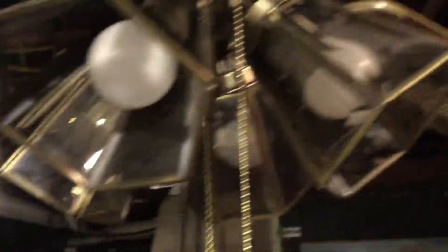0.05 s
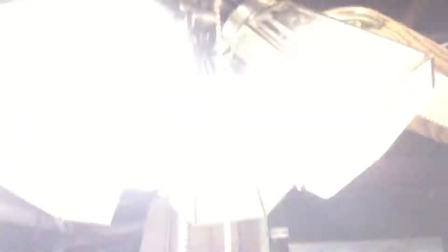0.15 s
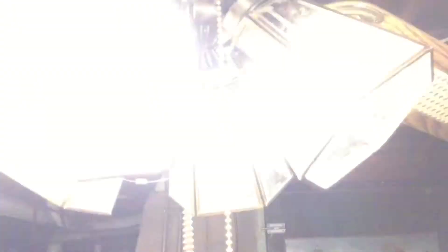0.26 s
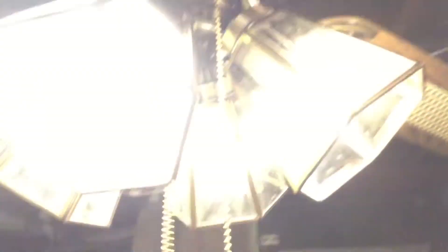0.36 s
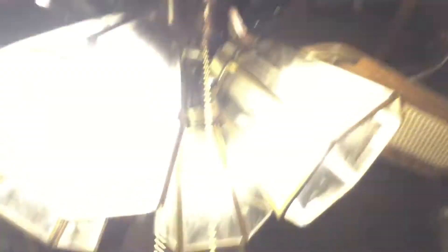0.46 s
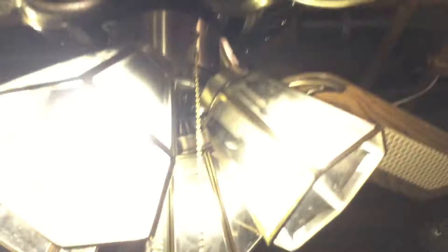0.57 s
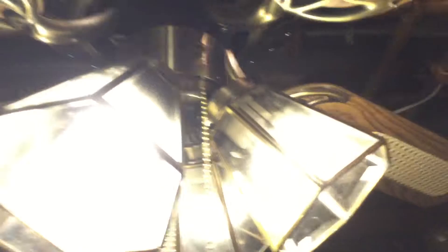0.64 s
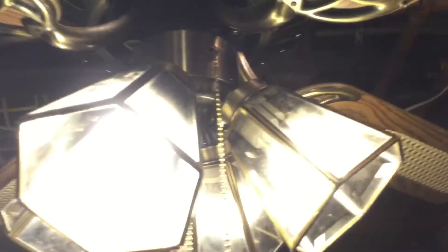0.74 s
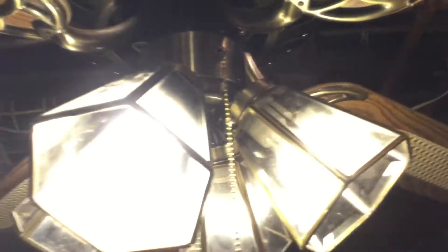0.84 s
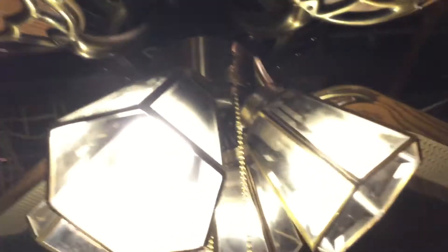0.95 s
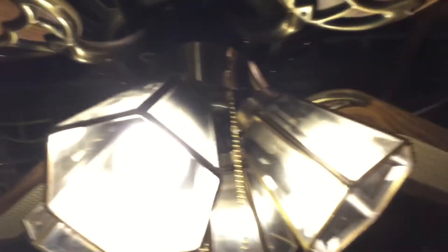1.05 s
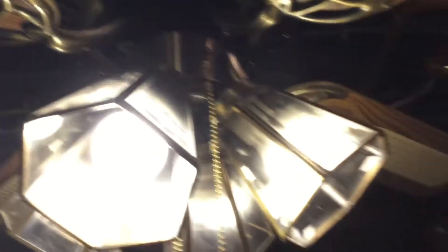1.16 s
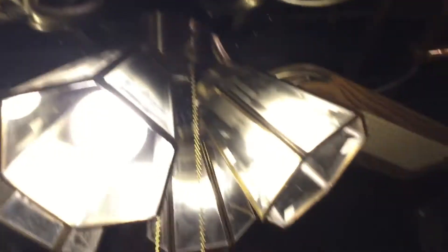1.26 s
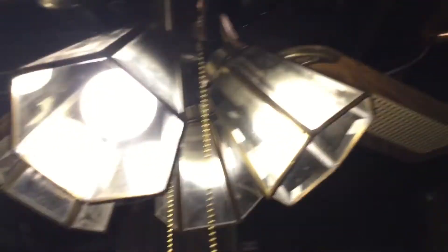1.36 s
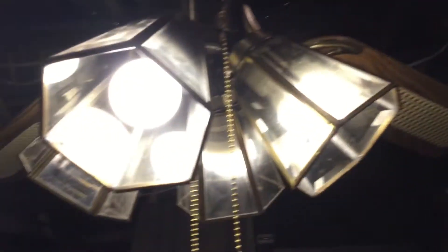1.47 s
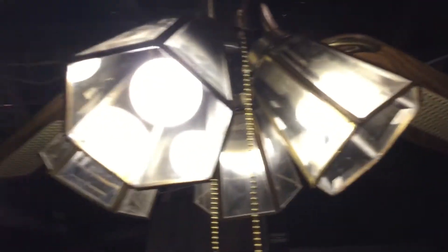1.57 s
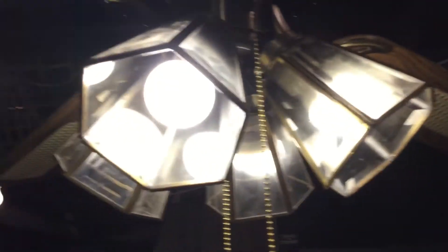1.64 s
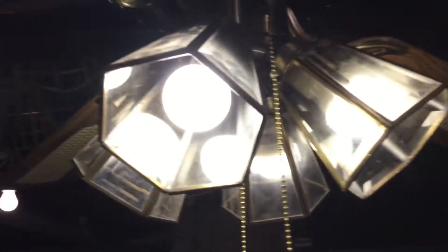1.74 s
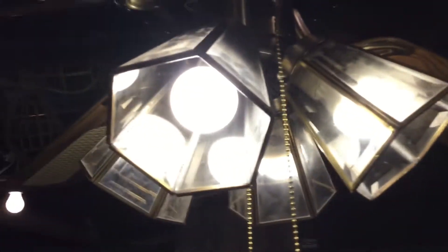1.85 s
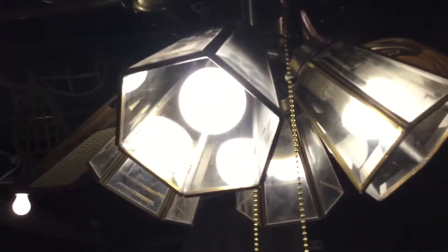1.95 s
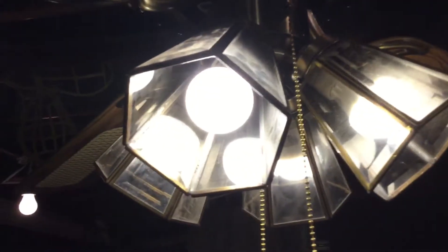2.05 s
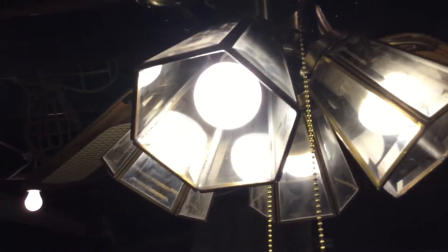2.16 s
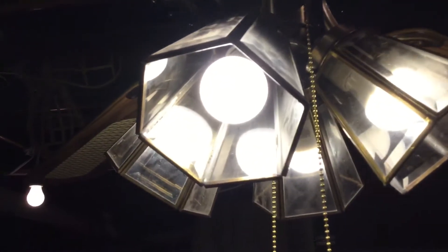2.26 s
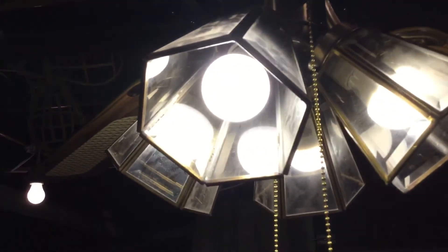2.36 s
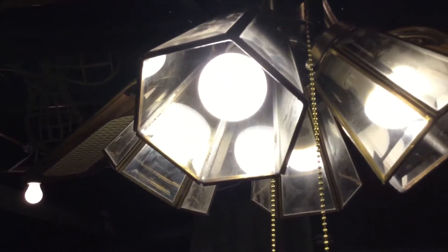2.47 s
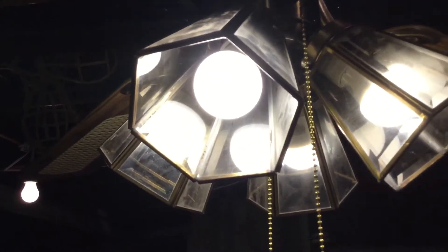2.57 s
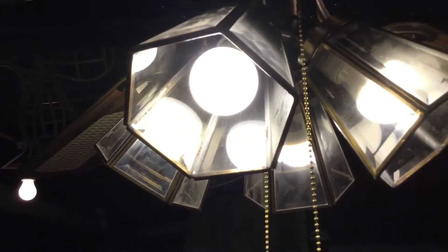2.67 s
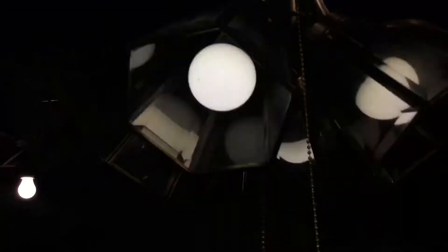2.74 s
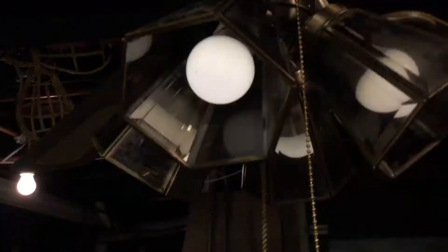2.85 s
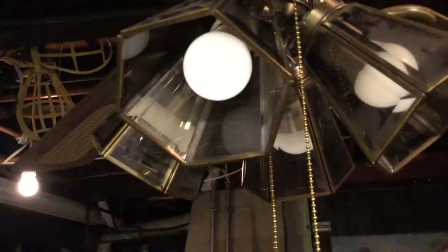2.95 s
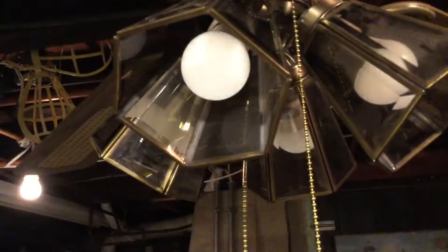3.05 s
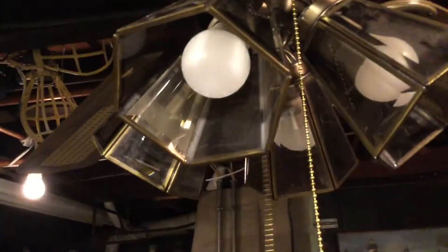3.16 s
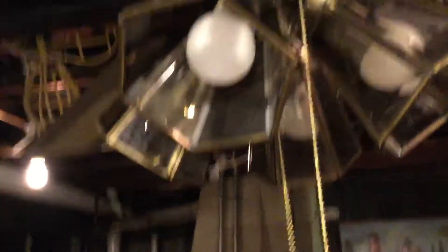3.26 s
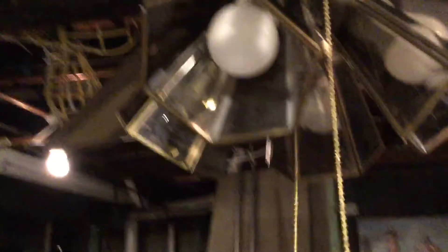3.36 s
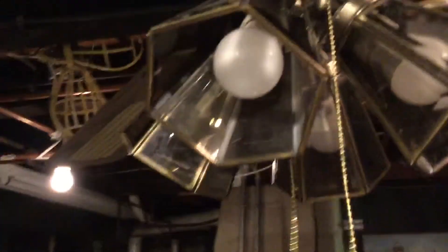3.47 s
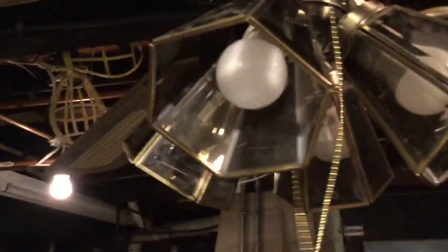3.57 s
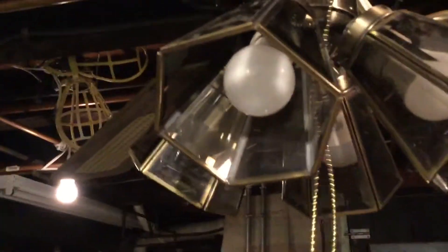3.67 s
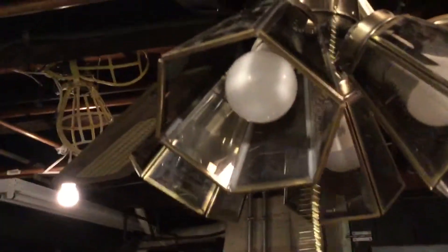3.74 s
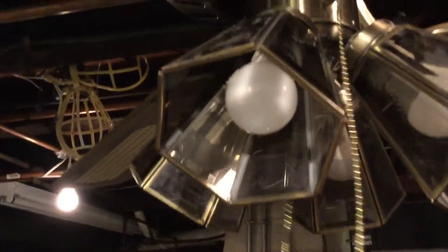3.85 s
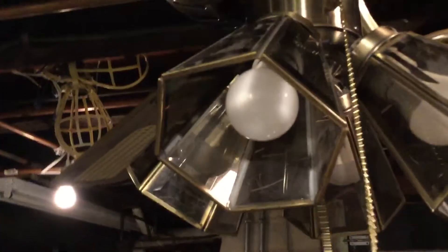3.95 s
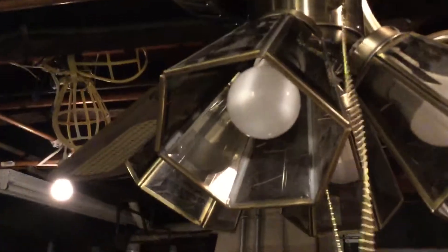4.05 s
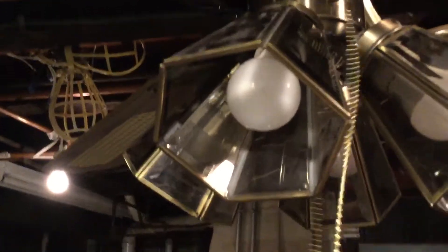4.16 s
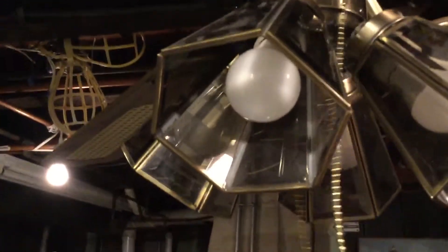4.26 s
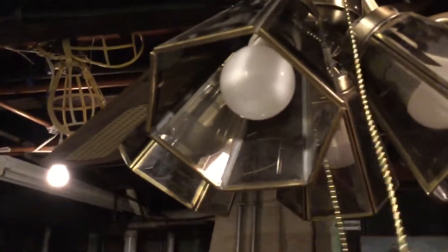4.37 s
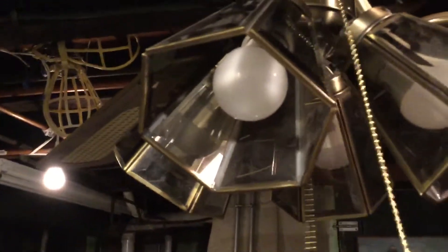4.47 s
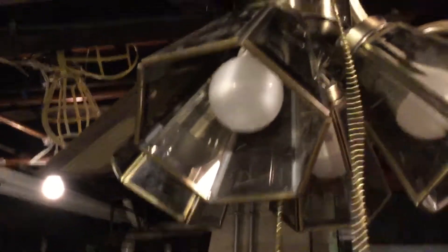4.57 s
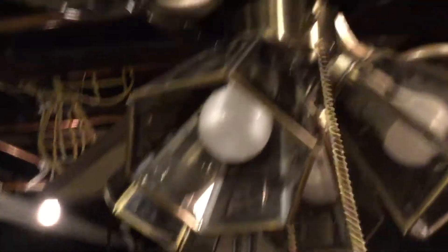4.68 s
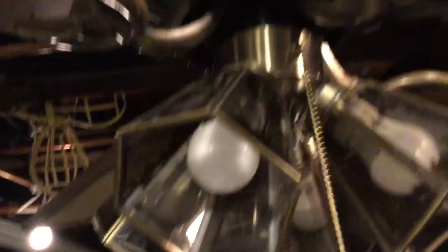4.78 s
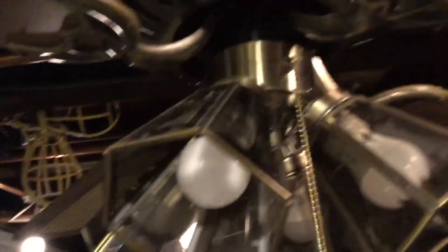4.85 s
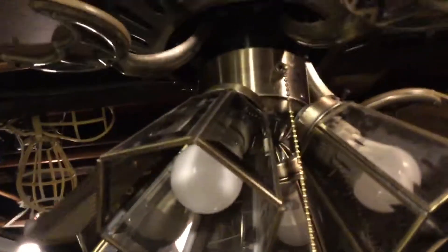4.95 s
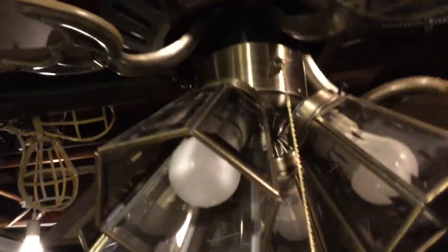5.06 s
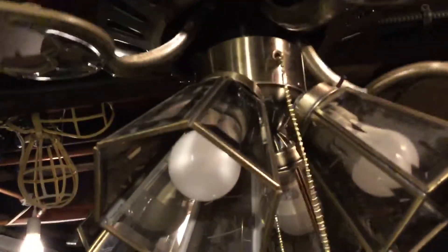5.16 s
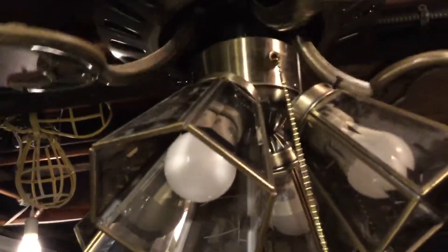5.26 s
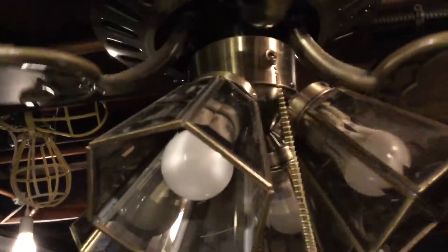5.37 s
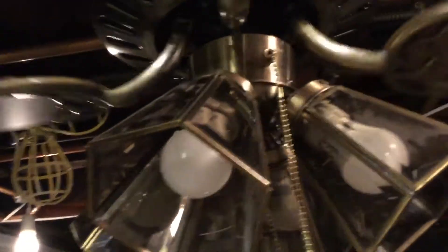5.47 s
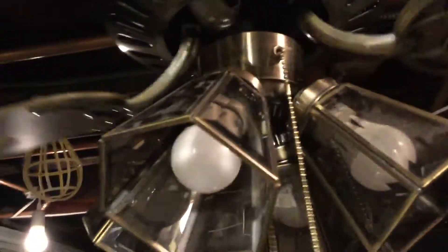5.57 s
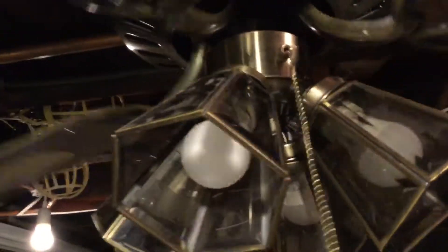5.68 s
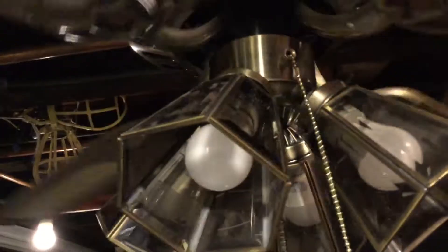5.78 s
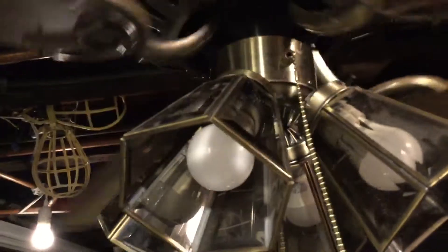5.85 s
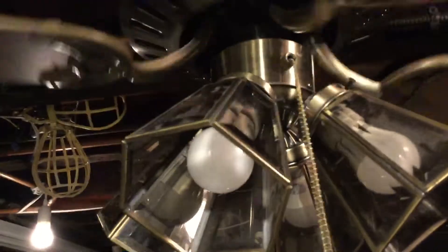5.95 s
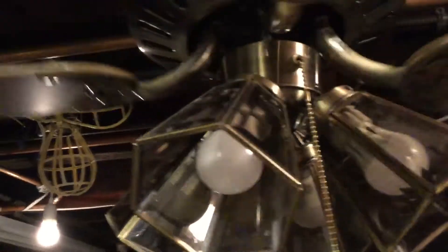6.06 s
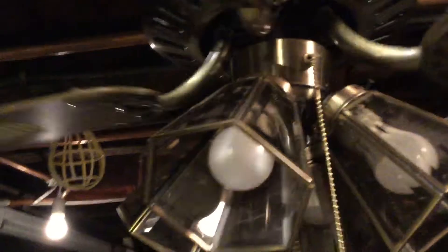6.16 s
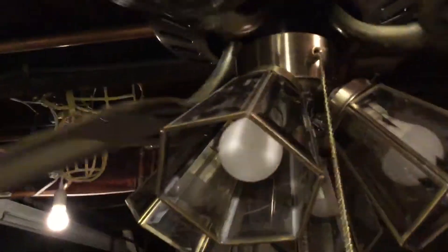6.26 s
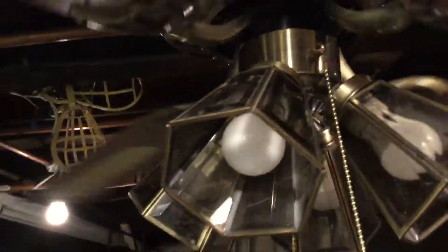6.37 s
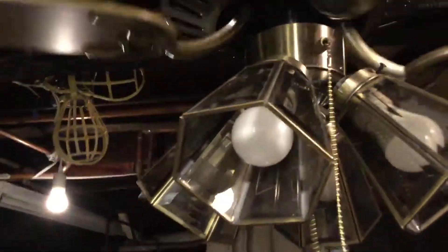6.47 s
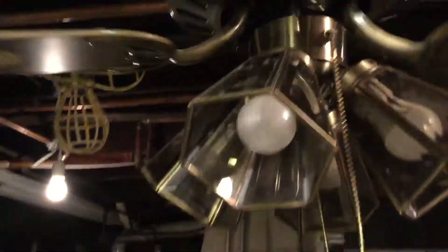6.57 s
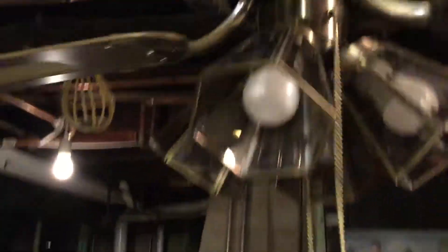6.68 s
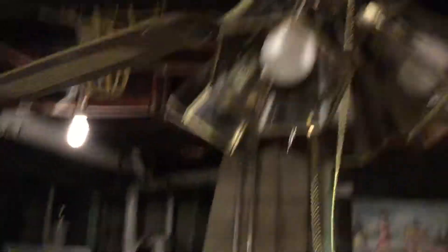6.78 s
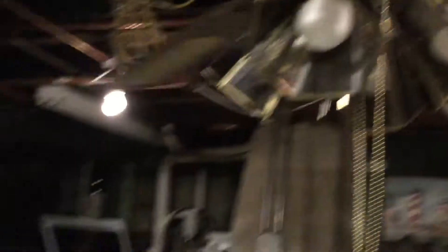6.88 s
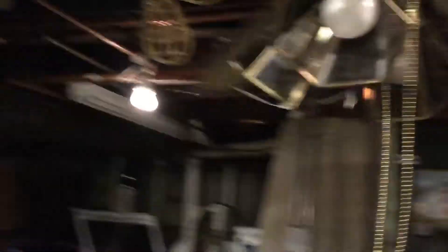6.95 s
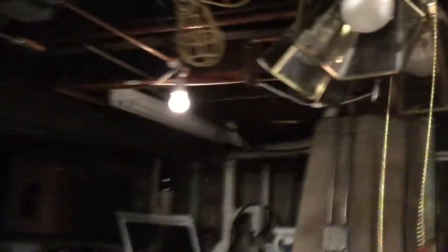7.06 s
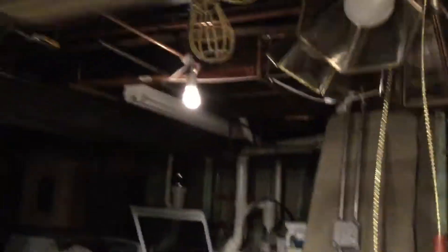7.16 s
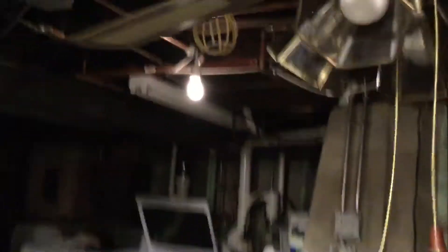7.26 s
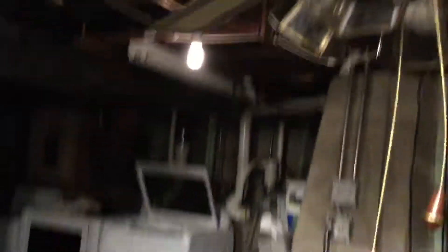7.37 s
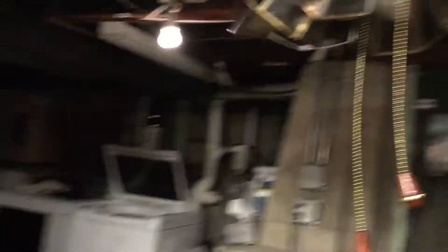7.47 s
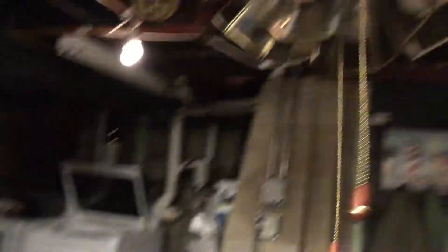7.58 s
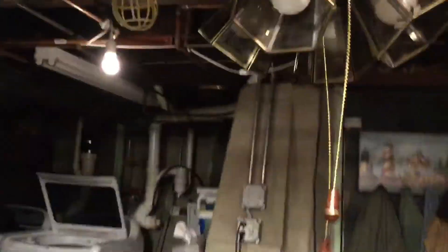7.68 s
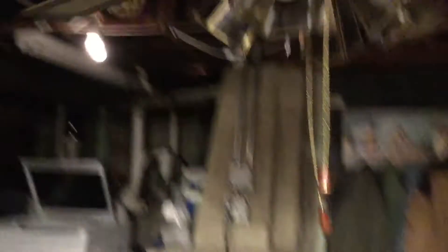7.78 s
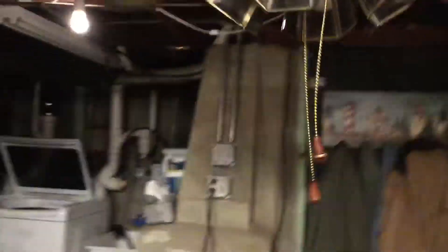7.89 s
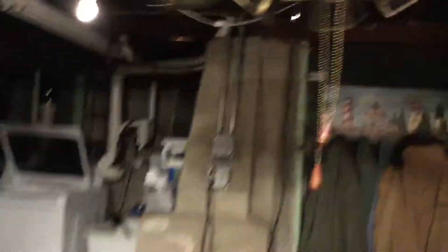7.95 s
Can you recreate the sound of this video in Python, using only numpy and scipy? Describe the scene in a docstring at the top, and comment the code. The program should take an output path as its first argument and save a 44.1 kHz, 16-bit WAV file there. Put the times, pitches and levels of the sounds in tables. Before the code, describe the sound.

Throughout, a quiet, wavering low fan hum and soft air wash sit under close, crisp mechanical sounds with a short basement echo. At 0.14 s a light chain is pulled with a ratcheting click and low thump, released at 0.28; the chain then taps glass from 0.43 at even intervals, fading rapidly. From 1.1 to 2.5 cloth scuffs softly, strongest near 1.6. The light switch clicks again at 2.8 and 2.9, followed by slack chain sliding until about 3.6. A metallic tick comes at 3.8, and a cloth brush at 4.3. Louder speed-switch snaps follow at 4.94, 5.49 and 6.06, released at 5.20, 5.77 and 6.35, with booms, beads zipping through brass and a brief low growl after the first. A mains-like buzz rises around 5.7 and eases after 6.4. From 7.1 to 7.45 fingers knock and rumble on the grip, then a slight scuff and hum until 8.

```python
"""In a basement, a ceiling fan hums close to a hand-held microphone.
Two pulls of a chain switch its light on and off, then the speed switch is pulled three times.
Switch teeth, chain and brass are short noise scrapes that set modes ringing; the housing booms in sines.
Beads, sliding chain and brushing clothes are trains of tiny contacts; fingers knock on the grip.
Wavering tones, a 120 Hz buzz and shaped noise make the motor and its air; scattered echoes make the room."""
import sys
import numpy as np
from scipy import signal
from scipy.fft import rfft, irfft
from scipy.io import wavfile
from scipy.ndimage import uniform_filter1d

SR = 44100
rng = np.random.default_rng(int(sys.argv[2]) if len(sys.argv) > 2 else 0)


def transcribe(u):
    """Save the signal u as a 16-bit wav file named by the first command-line argument.

    u: samples, shape (n,) or (channels, n), limited to [-1, 1]; the rate is SR.
    q: integer samples, one column per channel.
    """
    v = np.clip(np.atleast_2d(u).T, -1, 1)
    q = np.round(v * 32767).astype(np.int16)
    wavfile.write(sys.argv[1], SR, q)


N = 353770  # length [samples]


def amp(db):
    """Decibels to gain."""
    return 10 ** (np.asarray(db) / 20)


def evened(x):
    """Scales to rms 1."""
    return x / np.sqrt(np.mean(abs(x) ** 2) + 1e-20)


def unit(x):
    """Scales to energy 1."""
    return x / (np.linalg.norm(x) + 1e-12)


def read(points, hz):
    """Reads a table on a log-frequency axis."""
    f, value = np.transpose(points)
    return np.interp(np.log(hz + 1), np.log(f + 1), value)


def add(mix, s, sound):
    """Lays a sound into the mix at time s."""
    part = mix[max(round(s * SR), 0):][:len(sound)]
    part += sound[:len(part)]


def colour(x, points, size=2048):
    """Minimum-phase filter with the given (frequency [Hz], gain [dB]) shape."""
    log_gain = np.log(amp(read(points, abs(np.fft.fftfreq(size, 1 / SR)))))
    taps = np.fft.ifft(np.exp(np.conj(signal.hilbert(log_gain)))).real
    return signal.fftconvolve(x, taps[:size // 2])[:len(x)]


def drift(width_hz, rate_hz=400):
    """Slow complex random modulation of rms 1, weaker beyond the given width."""
    hz = np.fft.fftfreq(4096, 1 / rate_hz)
    spectrum = np.exp(2j * np.pi * rng.random(len(hz))) / (1 + (hz / width_hz) ** 2)
    slow = np.fft.ifft(spectrum)
    return evened(np.interp(np.arange(N) / SR, np.arange(len(hz)) / rate_hz, slow))


def swells(rows):
    """Gain per sample of movements that each rise to a peak and fall away."""
    t = np.arange(N) / SR
    return sum(amp(db) * np.exp(-((t - s) / np.where(t < s, rise, fall)) ** 2)
               for s, db, rise, fall in rows)


def ring(modes, t):
    """Dying sines with random starting phases, as a struck part rings; energy 1."""
    return unit(sum(amp(db - 60 * t / t60) * np.sin(2 * np.pi * (hz * t + rng.random()))
                    for hz, db, t60 in modes))


def clicks(rows, blow, modes, ring_db, rattle_db, rattle_s, ping_s, uneven_db=3):
    """Each contact is a short scrape with a fading rattle, the part's ringing modes and one short ping."""
    out, t = np.zeros(N), np.arange(SR // 5) / SR
    for s, db, thud_db, sparkle_db, length, ping_hz, ping_db in rows:
        scrape, rattle = rng.standard_normal((2, len(t))) * (rng.random((2, len(t))) < .5)
        chatter = amp(uneven_db * evened(uniform_filter1d(rng.standard_normal(len(t)), size=40)))
        u = t / max(length, 1e-4)
        scrape = unit(scrape * u * np.exp(-2.3 * u))
        rattle = unit(rattle * chatter * (1 - np.exp(-u)) * np.exp(-t / rattle_s))
        contact = scrape + amp(rattle_db) * rattle
        build = 1 - np.exp(-2 * u)  # ringing grows while the contact lasts
        body = unit(colour(contact, blow)) + amp(ring_db) * ring(modes, t) * build
        body = unit(colour(body, [(900, thud_db), (2000, 0), (5500, 0), (11000, sparkle_db)]))
        # the spot that is struck favours one short resonance
        ping = unit(build * np.exp(-t / ping_s) * np.sin(2 * np.pi * ping_hz * t))
        body = body + amp(ping_db) * ping
        attack_rms = np.sqrt(np.mean(body[t < .008] ** 2))
        add(out, s, amp(db) * body / attack_rms)
    return out


def strokes(rows, teeth):
    """Clicks of a switch: each stroke passes the same teeth at its own pace, then snaps."""
    hits = []
    for s, db, travel, ratchet_db, ping_hz, *_ in rows:
        for k, (to_go, accent_db, thud_db, sparkle_db, length, ping_db) in enumerate(teeth):
            is_snap = k == len(teeth) - 1
            hit_db = db + accent_db + (0 if is_snap else ratchet_db)
            hits.append((s - to_go * travel, hit_db, thud_db, sparkle_db, length, ping_hz, ping_db))
    return hits


def touches(rows, touch):
    """Clicks of one kind of contact, differing only in time, strength and sparkle."""
    thud_db, length, ping_hz, ping_db = touch
    return [(s, db, thud_db, sparkle_db, length, ping_hz, ping_db) for s, db, sparkle_db in rows]


def grains(per_s, spread_db, clump_db=3, clump_hz=70):
    """A random train of tiny contacts of uneven size that come in clumps; rms 1."""
    size = amp(abs(spread_db) * np.minimum(rng.exponential(1, N), 4))
    clumps = amp(clump_db * np.clip(evened(drift(clump_hz).real), -2, 2))
    hits = rng.standard_normal(N) * (rng.random(N) < per_s / SR)
    return evened(size * clumps * hits)


def rubbing(gain, shape, per_s, clump_db=2):
    """Surfaces catch and slip in many tiny contacts."""
    return gain * evened(colour(grains(per_s, spread_db=0.6, clump_db=clump_db), shape))


# pulls of the speed chain: (time of the snap [s], level [dB], ratchet travel [s], ratchet re snap [dB],
# ping [Hz], low boom [dB], high boom [dB], beads [dB])
SPEED_PULLS = [(4.9412, -23.5, .0326, -9.5, 2740, -37.5, -48, -63.5),
               (5.4903, -25, .0335, -7.5, 2780, -45.5, -37, -57),
               (6.0556, -25.5, .0264, -5.5, 2690, -48.5, -38.5, -53)]
# the speed chain is let go: (time of the snap [s], level [dB], ratchet travel [s],
# ratchet re snap [dB], ping [Hz])
SPEED_RETURNS = [(5.2047, -24, .0263, -4.5, 5320), (5.7684, -22, .0244, -7, 1745),
                 (6.3539, -21.5, .0356, -11.5, 4205)]
# teeth of each stroke, last row the snap: (share of travel to go [0-1], accent [dB], extra thud [dB],
# extra sparkle [dB], scrape length [s], ping [dB])
SPEED_PULL_TEETH = [(1, -1, 4, 4, .0045, -2), (.35, 0, 10, -2, .006, -4), (0, 0, 5.5, -6, .0044, -5)]
SPEED_RETURN_TEETH = [(1, .5, 4, 5, .0023, -9), (.5, -.5, -4, 2, .0026, -13), (0, 0, 2, 0, .003, -9)]  # same columns
# beads catch at the mouth of the switch: (time [s], level [dB], extra sparkle [dB])
BEAD_CATCHES = [(4.899, -42, -10), (5.4293, -47.5, -14), (6.0005, -43, 2), (6.0145, -38, 7),
                (6.2754, -46, -8)]
# feel of a bead catch: (extra thud [dB], scrape length [s], ping [Hz], ping level [dB])
CATCH_TOUCH = (8, .008, 900, -9)
# colour of the blow: (frequency [Hz], relative level [dB])
SPEED_BLOW = [(130, -6.5), (290, -10.5), (420, -15.5), (650, -16), (950, -4.5), (2200, 1), (2800, 1.5),
              (5500, -2.5), (8000, -6), (10000, -11.5), (12000, -6.5), (14200, 0.5), (16000, -10.5)]
# ringing of the switch: (frequency [Hz], relative level [dB], t60 [s])
SPEED_MODES = [(926, 3.5, 0.023), (1116, -8, 0.17), (1278, -13.5, .1), (1778, -1, .04), (2650, 4, 0.034),
               (2870, 0.5, 0.017), (2805, -2, 0.075), (3360, -2.5, .05), (3600, -2, 0.094),
               (3780, 4, 0.046), (4100, -4, 0.068), (4540, -4, 0.1), (5470, 2, 0.072), (5376, 4.5, 0.026),
               (5930, -3, .06), (6770, 1, 0.072), (13780, -4, 0.034), (15830, -6, .05)]


def speed_switch():
    """A ratchet ticks over its teeth and snaps, on each pull and each release; beads catch at its mouth."""
    hits = strokes(SPEED_PULLS, SPEED_PULL_TEETH) + strokes(SPEED_RETURNS, SPEED_RETURN_TEETH)
    hits += touches(BEAD_CATCHES, CATCH_TOUCH)
    return clicks(hits, SPEED_BLOW, SPEED_MODES, ring_db=-8.5, rattle_db=-7, rattle_s=0.015,
                  ping_s=0.0039, uneven_db=4.5)


# pulls of the light chain: (time of the snap [s], level [dB], ratchet travel [s], ratchet re snap [dB],
# ping [Hz], low boom [dB])
LIGHT_PULLS = [(0.1425, -27.5, .034, -12.5, 3800, -45.5), (2.8087, -29.5, .037, -18, 2440, -50)]
# the light chain is let go: (time of the snap [s], level [dB], ratchet travel [s],
# ratchet re snap [dB], ping [Hz])
LIGHT_RETURNS = [(0.2766, -28.5, .0244, -12, 3730), (2.9242, -25.5, .034, -14, 3460)]
# teeth of each stroke, last row the snap: (share of travel to go [0-1], accent [dB], extra thud [dB],
# extra sparkle [dB], scrape length [s], ping [dB])
LIGHT_PULL_TEETH = [(1, -9.5, 5, -22, .014, -12), (.3, -2, -3, -3, .013, -13), (0, 0, 3.5, 0, .0019, -6.5)]
LIGHT_RETURN_TEETH = [(1, -10, -9, -9, .008, -16), (.3, 0, -20, -11, .008, -20), (0, 0, 2, -4, .0027, -8)]  # same columns
# colour of the blow: (frequency [Hz], relative level [dB])
LIGHT_BLOW = [(150, -36), (350, -6.5), (550, 0.5), (900, -3.5), (1700, -5), (3700, -2), (4900, -12),
              (7000, -5.5), (9500, -20.5), (12300, -7.5), (15500, -15.5)]
# ringing of the switch: (frequency [Hz], relative level [dB], t60 [s])
LIGHT_MODES = [(450, -2, 0.055), (572.7, -3.5, 0.16), (1144, -1, 0.054), (1398, -4.5, 0.038),
               (2080, -7.5, 0.17), (2206, -0.5, 0.048), (2510, -10, 0.044), (3070, 1.5, 0.1),
               (3470, -2.5, .04), (3760, 5, 0.065), (4090, -12, .06), (5420, -4, .08), (7200, -8.5, 0.051),
               (6640, -7, .04), (13000, -18, .04)]


def light_switch():
    """A ratchet ticks over its teeth and snaps, on each pull and each release."""
    hits = strokes(LIGHT_PULLS, LIGHT_PULL_TEETH) + strokes(LIGHT_RETURNS, LIGHT_RETURN_TEETH)
    return clicks(hits, LIGHT_BLOW, LIGHT_MODES, ring_db=-7.5, rattle_db=-4.5, rattle_s=.016,
                  ping_s=0.0024, uneven_db=4)


# low and high boom of the housing: (frequency [Hz], hold [s], t60 [s])
HOUSING_MODES = [(61, .07, .25), (108, .098, .15)]


def housing(delay_s=.003, rise_s=0.004, shake=0.45, after_db=-13, after_t60_s=1.1):
    """Each pull sets off low booms that swell, hold and die away into a faint after-ring."""
    out, t = np.zeros(N), np.arange(SR) / SR
    low, high = HOUSING_MODES
    booms = [(s, low_db, *low) for s, _, _, _, _, low_db, *_ in LIGHT_PULLS + SPEED_PULLS]
    booms += [(s, high_db, *high) for s, *_, high_db, _ in SPEED_PULLS]
    for s, db, hz, hold, t60 in booms:
        main_fade_db = -60 * np.maximum(t - hold, 0) / t60
        fade_db = np.maximum(main_fade_db, after_db - 60 * t / after_t60_s)
        swell = (1 - np.exp(-(t / rise_s) ** 2)) * amp(db + fade_db)
        tone = ((1 + shake * drift(25)[:SR]) * np.exp(2j * np.pi * hz * t)).imag
        add(out, s + delay_s, np.sqrt(2) * swell * tone)
    return out


def bounces(count=4, start_s=0.4306, period_s=.0933, db=-33.3, loss_db=8.7, sparkle_db=-2.5):
    """The freed chain swings against a shade at even intervals, losing the same share each time."""
    return [(start_s + k * period_s, db - k * loss_db, sparkle_db) for k in range(count)]


# stray slaps on the glass: (time [s], level [dB], extra sparkle [dB])
CHAIN_SLAPS = [(0.2872, -32, -35), (0.3448, -50, -10), (0.5086, -50.5, -12), (2.935, -36, -23),
               (3.1097, -48.5, -3), (3.5182, -55, -19), (3.617, -58, -25), (4.795, -56, -19),
               (6.553, -58.5, -7)]
# feel of a slap: (extra thud [dB], scrape length [s], ping [Hz], ping level [dB])
CHAIN_TOUCH = (6, .0017, 3520, -4.5)
# colour of the blow: (frequency [Hz], relative level [dB])
CHAIN_BLOW = [(400, -15), (1700, -19), (2200, -5), (3600, 3.5), (4900, -16.5), (6400, -14.5), (7900, 0),
              (9500, -26), (12000, -21), (14000, 0), (16000, -29.5)]
# ringing of chain on glass: (frequency [Hz], relative level [dB], t60 [s])
CHAIN_MODES = [(2125, 3.5, 0.08), (2800, -46, .09), (2970, -26, .1), (3450, 5, 0.09), (3578, 2, 0.096),
               (3810, 1, .12), (5420, -20, 0.17), (6190, -7.5, 0.1), (7400, 6, .06), (8000, -13, .07),
               (14180, -14, 0.053), (14600, -3, .05)]


def chain_on_glass():
    """The chain slaps the glass shades: bright contacts with a rattle and glassy ringing."""
    return clicks(touches(bounces() + CHAIN_SLAPS, CHAIN_TOUCH), CHAIN_BLOW, CHAIN_MODES,
                  ring_db=-7, rattle_db=0.5, rattle_s=0.013, ping_s=0.0013)


# ticks on the fitting: (time [s], level [dB], extra sparkle [dB])
BRASS_TICKS = [(3.7786, -44, 0.5), (4.026, -63, 2), (4.565, -59, 0), (4.694, -56, -3), (4.8189, -55, -25),
               (6.9191, -54, -30)]
# feel of a tick: (extra thud [dB], scrape length [s], ping [Hz], ping level [dB])
BRASS_TOUCH = (0, .0035, 4800, -7)
# colour of the blow: (frequency [Hz], relative level [dB])
BRASS_BLOW = [(400, 2), (1100, -10), (1600, -1.5), (2400, -2), (4000, -2), (4850, -0.5), (5800, -5),
              (7000, -2), (7900, -4), (8600, -8), (12300, -3), (16000, -15)]
# ringing of the fitting: (frequency [Hz], relative level [dB], t60 [s])
BRASS_MODES = [(2260, 4, 0.043), (4600, -4.5, 0.023), (5000, -5, 0.054), (6930, 5, .04), (8480, 4, 0.076),
               (12300, -7, .04)]


def chain_on_brass():
    """The chain ticks against the brass fitting, which rings briefly."""
    return clicks(touches(BRASS_TICKS, BRASS_TOUCH), BRASS_BLOW, BRASS_MODES,
                  ring_db=-8.5, rattle_db=-7, rattle_s=.008, ping_s=0.0029)


# the hand gathers the speed chain: (time of the peak [s], level [dB], rise [s], fall [s])
GATHERS = [(4.73, -66, .07, .15), (5.135, -65, .025, .02), (5.405, -63, .025, .025)]
# ringing of the taut chain and its fitting: (frequency [Hz], relative level [dB], t60 [s])
BEAD_MODES = [(1070, -10.5, 0.049), (1330, -17, 0.049), (2165, -5, .02), (2930, -5.5, .03),
              (3670, -14, .04), (4440, -3.5, .025), (5340, -8, .03), (8430, -11, .02),
              (10800, -12.5, 0.017), (13000, -0.5, .006), (14000, -5, .008), (14500, 2, 0.0046)]
# the taut chain sings: (frequency [Hz], relative level [dB])
CHAIN_TONES = [(4436, -77), (5319, -72), (13464, -80), (13609, -79), (14002, -70), (14314, -74),
               (14341, -75), (14707, -78), (15219, -82)]
# colour of the bare ticks: (frequency [Hz], relative level [dB])
BEAD_COLOUR = [(300, -14), (1000, 3), (2500, -5.5), (5000, -2.5), (7000, -6), (10000, -11), (12500, -5),
               (14300, 6.5), (16000, -8.5)]


def beads(ring_db=-2, sing_db=-5.5, sing_t60_s=.25, delay_s=.06, rise_s=.075, fall_s=.105):
    """Beads of the taut chain run through the brass fitting after each speed pull and make it sing."""
    runs = [(s + delay_s, db, rise_s, fall_s) for s, *_, db in SPEED_PULLS]
    ticks, t = grains(per_s=2500, spread_db=2, clump_db=4), np.arange(SR // 4) / SR
    tones = [(hz, db, sing_t60_s) for hz, db in CHAIN_TONES]
    rung = signal.fftconvolve(ticks, ring(BEAD_MODES, t))[:N]
    sung = signal.fftconvolve(ticks, ring(tones, t))[:N]
    bare = evened(colour(ticks, BEAD_COLOUR))
    return swells(GATHERS + runs) * evened(amp(ring_db) * evened(rung) + amp(sing_db) * evened(sung) + bare)


# movements of the slack chain: (time of the peak [s], level [dB], rise [s], fall [s])
SLIDES = [(3.035, -57, .03, .022), (3.22, -61, .025, .035), (3.47, -58, .13, .16)]
# colour of chain on skin: (frequency [Hz], relative level [dB])
SLIDE_COLOUR = [(200, 2), (800, 6), (1700, 1), (2200, 4), (2800, -4), (3700, -2), (4400, -8), (7500, -10),
                (10000, -18), (15500, -15.5)]


def chain_slide():
    """The slack chain slides through the fingers in a dense train of contacts."""
    return rubbing(swells(SLIDES), SLIDE_COLOUR, per_s=14000)


# fingers on the grip: (time [s], level [dB], extra thud [dB], extra sparkle [dB], scrape length [s],
# ping [Hz])
GRIP_KNOCKS = [(7.1406, -48.5, 6, -4, .005, 1200), (7.1575, -33.5, 14, -4, .002, 330),
               (7.1693, -44, 22, -15, .0099, 650), (7.187, -49, 2, -16, .002, 920),
               (7.2241, -54.5, 11, -2, .0017, 590), (7.2674, -39, -2, 8, .001, 900),
               (7.2798, -46, 5, -6, .0014, 390), (7.3287, -36.5, 27, 4, .0012, 660),
               (7.342, -48, 13, 8, .004, 600), (7.3803, -44.5, -12, -12, .0014, 390),
               (7.4265, -32, 7, -8, .0043, 1090), (7.434, -38, 4, -7, .0081, 280),
               (7.442, -31, -4, -8, .00084, 420)]
# colour of the blow: (frequency [Hz], relative level [dB])
GRIP_BLOW = [(50, -18), (250, -1.5), (650, -3.5), (1100, 0.5), (1800, -15), (4800, -14.5), (6200, -20),
             (10000, -18), (16000, -41)]
# ringing of the grip: (frequency [Hz], relative level [dB], t60 [s])
GRIP_MODES = [(620, 7, 0.027), (875, 1, 0.011), (1240, -5, .012)]


def grip_knocks(ping_db=-5.5):
    """Fingers knock on the grip: short blows on a body that rings only briefly."""
    return clicks([(*knock, ping_db) for knock in GRIP_KNOCKS], GRIP_BLOW, GRIP_MODES,
                  ring_db=-10.5, rattle_db=-14, rattle_s=0.0066, ping_s=0.0018)


# shifts of the fingers: (time of the peak [s], level [dB], rise [s], fall [s])
RUMBLES = [(7.168, -41, .02, .018), (7.4, -56, .07, .05)]
# colour of the case: (frequency [Hz], relative level [dB])
RUMBLE_COLOUR = [(20, -13), (45, -1.5), (80, -8.5), (160, -11), (330, -8.5), (600, -19), (2000, -56)]


def case_rumble():
    """The case rumbles as the fingers shift: sparse contacts with most of the treble removed."""
    return rubbing(swells(RUMBLES), RUMBLE_COLOUR, per_s=2000)


# brushes as the arm moves: (time of the peak [s], level [dB], rise [s], fall [s])
BRUSHES = [(1.79, -62, .1, .07), (2.49, -61, .025, .03), (3.70, -58, .03, .05), (4.21, -61, .018, .04),
           (4.32, -51, .04, .045), (7.28, -59.5, .12, .2), (7.415, -51.5, .035, .02)]
# the cloth catches and lets go: (time [s], level [dB], decay time [s])
SCUFFS = [(1.125, -60, 0.034), (1.372, -49.5, 0.029), (1.580, -39.5, 0.03), (1.778, -60, 0.045),
          (1.816, -54, 0.018), (1.929, -51, 0.023), (2.268, -62, 0.033), (2.35, -58, 0.017),
          (2.512, -54, 0.018), (3.638, -54, 0.084), (4.287, -53.5, 0.04), (4.846, -46, 0.064),
          (5.703, -48.5, 0.07), (7.52, -51.5, .025)]
# colour of the cloth: (frequency [Hz], relative level [dB])
BRUSH_COLOUR = [(120, -9.5), (300, 7), (450, -4), (650, 2.5), (1200, 3), (1700, 0.5), (2200, -2),
                (4000, -6), (6000, -15), (9000, -25), (16000, -34)]


def clothes(rise_s=0.0018):
    """Cloth brushes as the arm moves, with sudden scuffs that die away."""
    gain, t = swells(BRUSHES), np.arange(SR // 3) / SR
    for s, db, decay in SCUFFS:
        add(gain, s, amp(db) * (1 - np.exp(-t / rise_s)) * np.exp(-t / decay))
    return rubbing(gain, BRUSH_COLOUR, per_s=8000, clump_db=2.2)


# growl after the first change of speed: (time of the peak [s], level [dB], rise [s], fall [s])
GROWL = (5.13, -50, .06, .27)


def growl(hz=63, shake=.5, shake_hz=14):
    """A low, unsteady growl while the motor takes up its new speed."""
    carrier = np.exp(2j * np.pi * hz * np.arange(N) / SR)
    return swells([GROWL]) * evened(((1 + shake * drift(shake_hz)) * carrier).real)


# motor hum: (frequency [Hz], level [dB], waver [share 0-1], waver width [Hz])
HUM = [(59, -73, 0.5, 5.4), (106.7, -68.5, 1, 8), (147, -61.5, .85, 8), (199.8, -56.5, 0.95, 6.5),
       (356.5, -77, .8, 10)]
# mains buzz, which swells after the second speed pull: (time [s], level [dB])
BUZZ = [(5.5, -86), (5.7, -56.5), (6.4, -56), (6.8, -63), (7.2, -65.5), (8.02, -66)]
# colour of moving air and room: (frequency [Hz], relative level per Hz [dB])
AIR = [(20, -36.5), (40, -26), (60, -12), (95, -10), (135, -3.5), (180, 5), (240, -4.5), (340, -6.5),
       (420, -18.5), (480, -20), (620, -13.5), (850, -22), (2000, -27.5), (16000, -42)]


def motor(air_db=-59.3, buzz_hz=120):
    """Wavering hum of the housing, mains buzz and the wash of air."""
    t = np.arange(N) / SR
    air_spectrum = rfft(rng.standard_normal(N)) * amp(read(AIR, np.fft.rfftfreq(N, 1 / SR)))
    out = amp(air_db) * evened(irfft(air_spectrum, N))
    for hz, db, waver, width in HUM:
        wavering = np.sqrt(1 - waver ** 2) + waver * drift(width)
        out += amp(db) * evened((wavering * np.exp(2j * np.pi * hz * t)).real)
    buzz_gain = amp(np.interp(t, *np.transpose(BUZZ)))
    return out + buzz_gain * evened(np.sin(2 * np.pi * buzz_hz * t))


# first echoes from shades, blades and ceiling: (delay [s], level re direct [dB])
ECHOES = [(.0033, -18.5), (.0058, -25), (.0091, -15)]


def nearby(x):
    """The direct sound with its first echoes."""
    out = x.copy()
    for delay, db in ECHOES:
        add(out, delay, amp(db) * x)
    return out


# decay of the basement: (frequency [Hz], t60 [s])
ROOM = [(100, 0.56), (500, .28), (1000, .22), (3000, 0.22), (6000, .2), (15000, 0.13)]


def basement(x, gap_s=0.0013, per_s=5000):
    """Scattered echoes from joists and walls, the treble dying first."""
    taps = rng.choice([-1., 1.], SR // 2) * (rng.random(SR // 2) < per_s / SR)
    hz, t, z = signal.stft(taps, SR, nperseg=256)
    tail = signal.istft(z * amp(-60 * t / read(ROOM, hz)[:, None]), SR)[1]
    after_gap = np.arange(len(tail)) / SR > gap_s
    return signal.fftconvolve(x, unit(tail * after_gap))[:N]


def scene(room_db=-13.5):
    """Switches and chain sound in the room; handling, clothes, booms and motor are added without echoes."""
    fan = speed_switch() + light_switch() + chain_on_glass() + chain_on_brass() + beads() + chain_slide()
    in_room = nearby(fan) + amp(room_db) * basement(fan)
    handling = grip_knocks() + case_rumble() + clothes()
    return (in_room + housing() + handling + growl() + motor())[None]


def record(dry, low_cut_hz=34, high_cut_hz=16000):
    """The microphone sheds the deepest bass, then the band is limited at the top."""
    thin = signal.sosfilt(signal.butter(4, low_cut_hz, "high", fs=SR, output="sos"), dry)
    low_pass = signal.firwin(401, high_cut_hz, window=("kaiser", 7), fs=SR)
    return signal.oaconvolve(thin, low_pass[None], "same")


dry = scene()
out = record(dry)
transcribe(out)
```